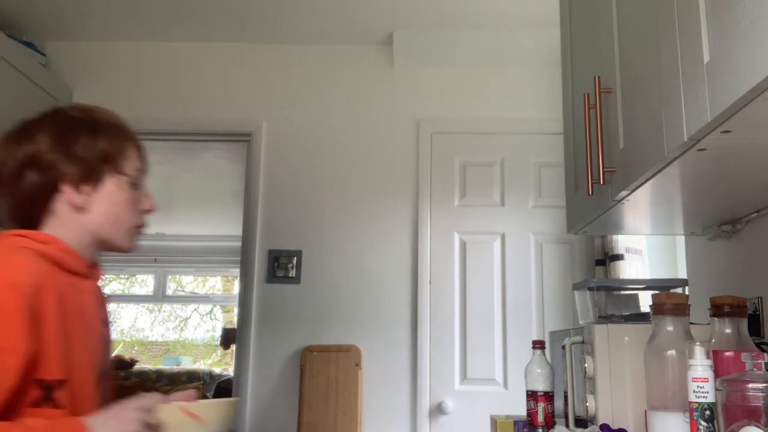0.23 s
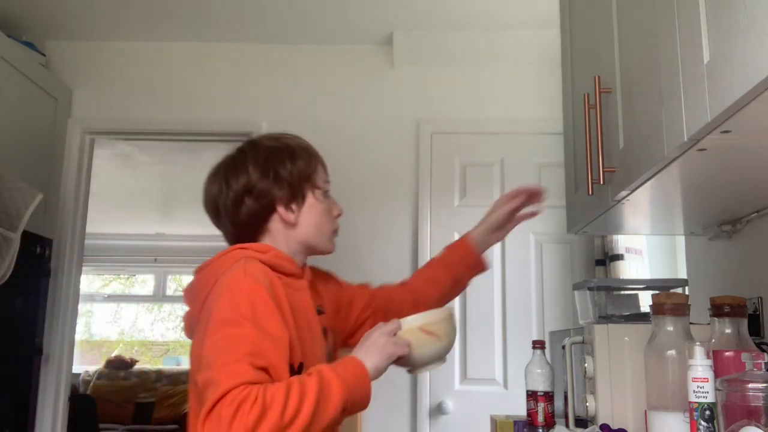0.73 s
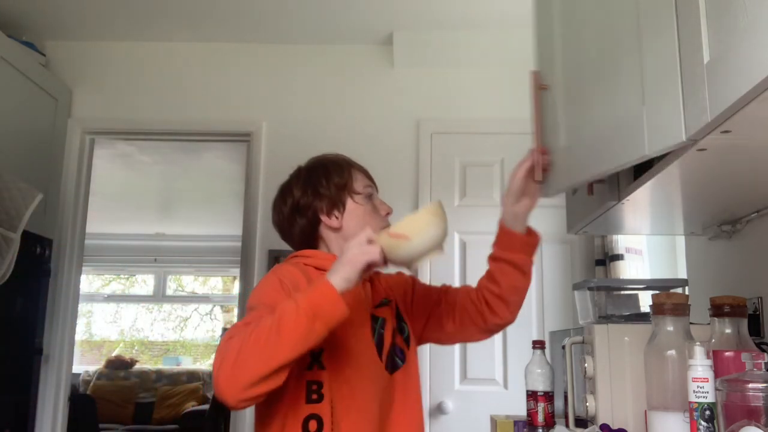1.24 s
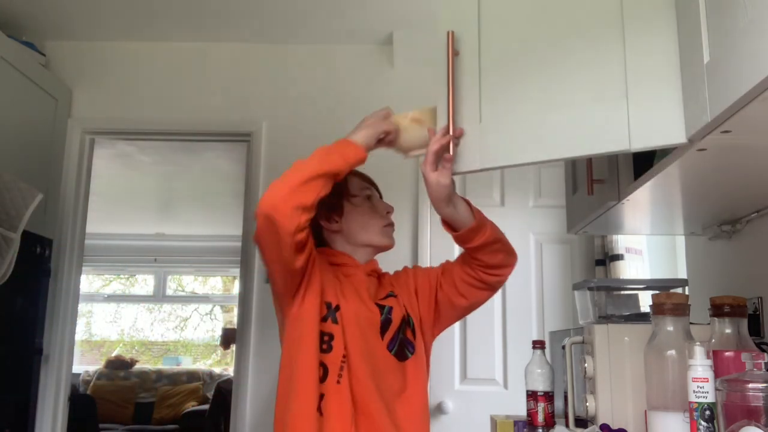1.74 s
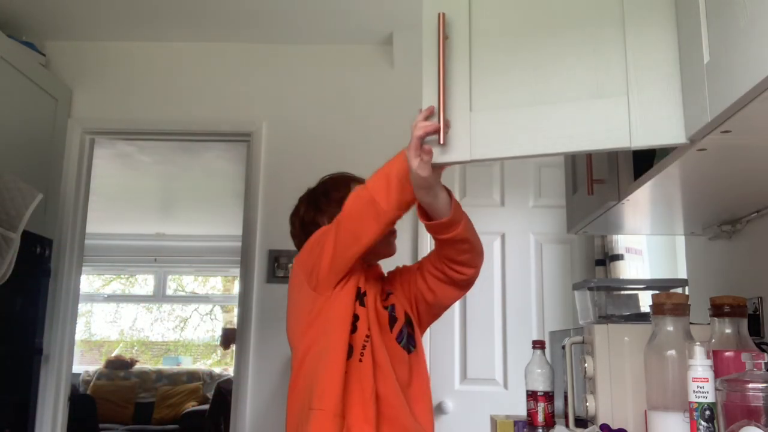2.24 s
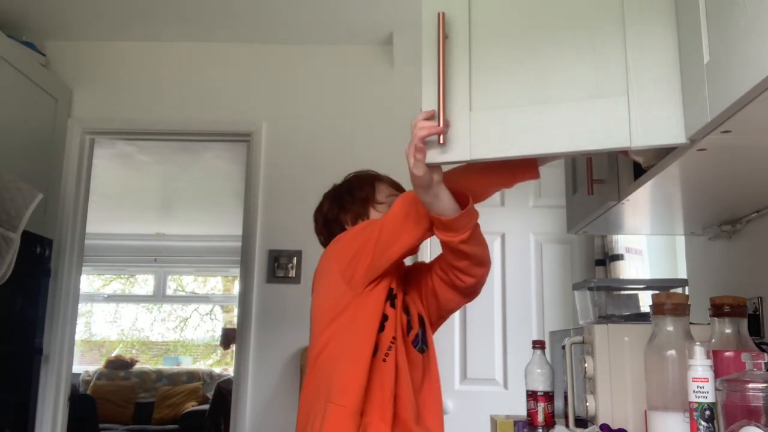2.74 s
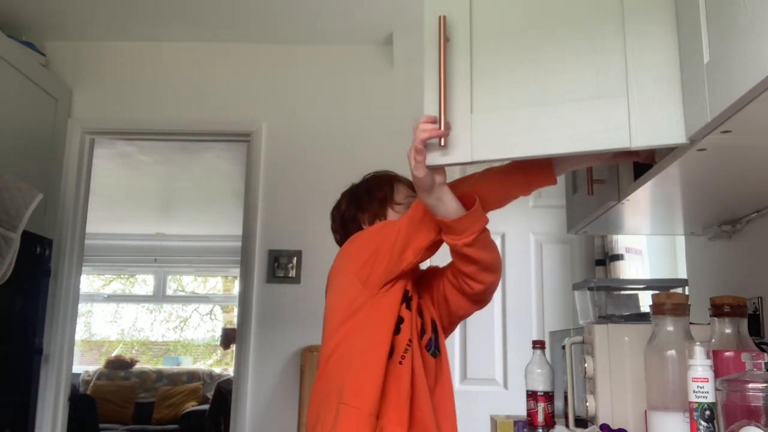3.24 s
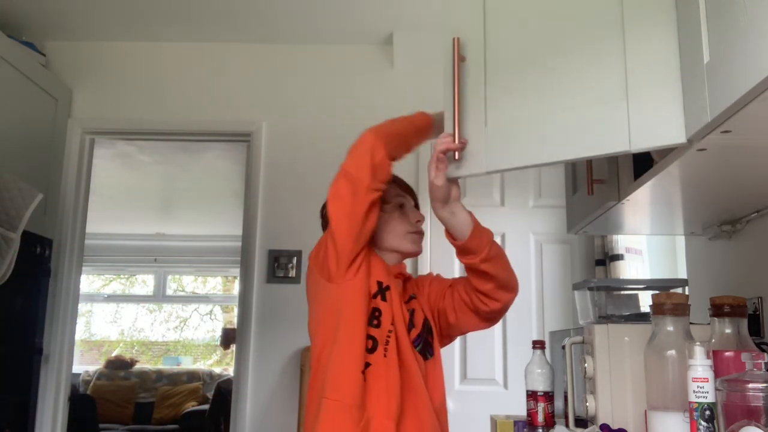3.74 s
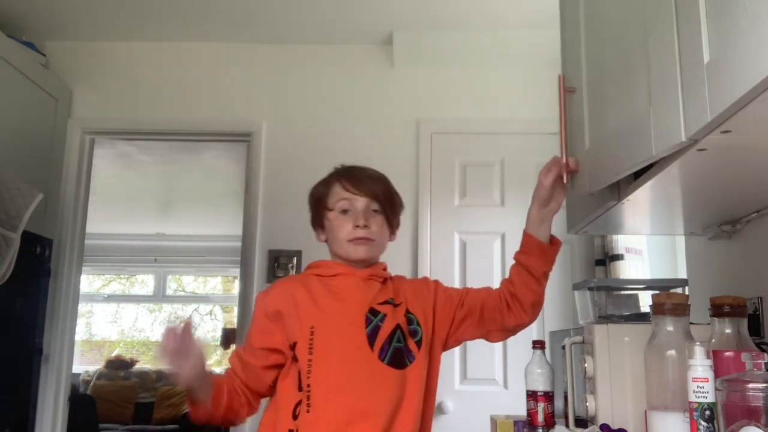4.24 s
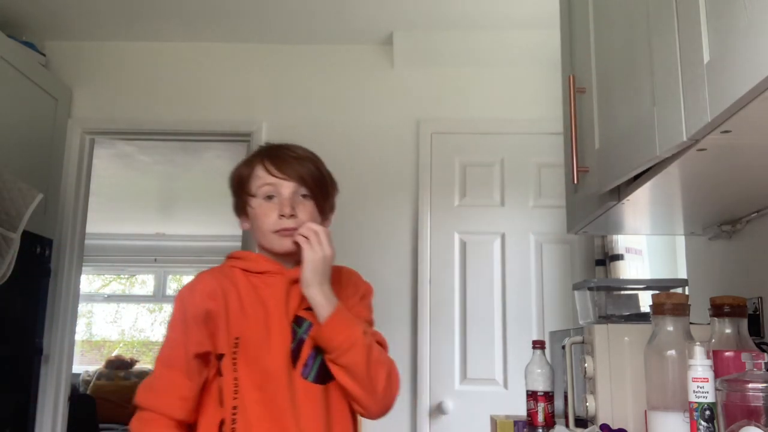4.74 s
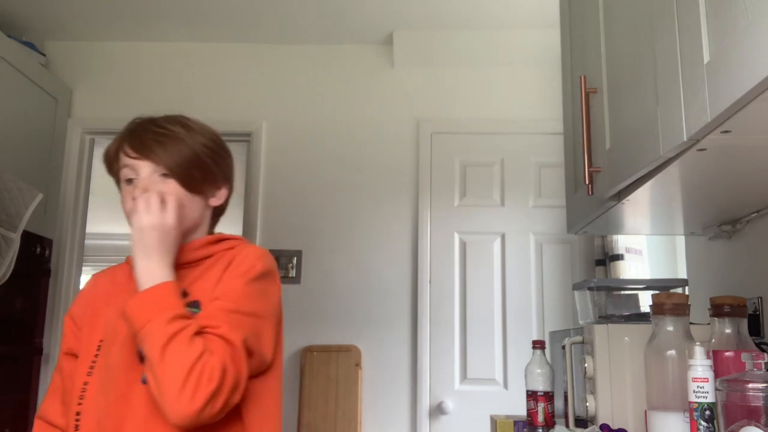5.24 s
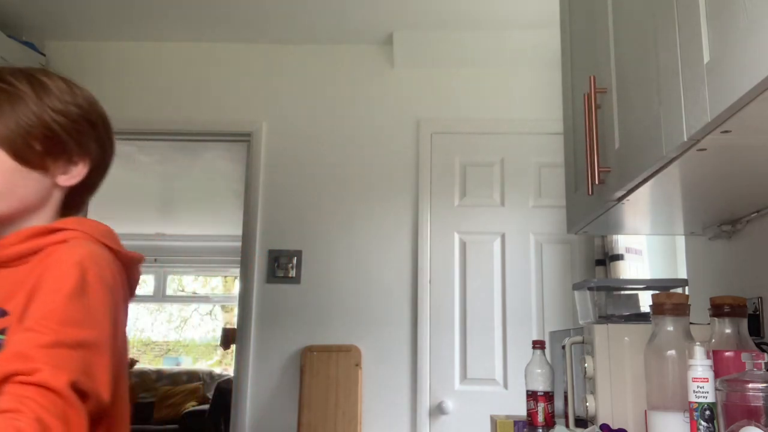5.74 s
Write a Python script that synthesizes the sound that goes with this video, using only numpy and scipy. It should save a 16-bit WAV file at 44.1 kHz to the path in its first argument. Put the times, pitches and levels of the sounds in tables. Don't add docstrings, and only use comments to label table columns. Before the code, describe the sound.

A quiet small kitchen, heard by a close stereo microphone pair with short reflections. Throughout, a propeller aircraft outside drones away: a deep beating hum with wavering overtones and soft roar, swelling around 1 to 3 s, sagging in pitch and nearly gone by 6 s; a faint windowpane hum fades too. At 0.1 to 0.3 s a spoon tinks very lightly. At 0.93 s a hand knocks the cupboard handle with a low thud; small clicks follow at 1.07 s and sharp hinge snaps with rattle at 1.4 s. At 2.9 s a bowl lands on the shelf, the loudest event, a woody boom with clatter, then a hard clack as it settles at 3.04 s. Soft sleeve brushing follows. From 4.1 s come rubbing, faint crockery tinkles and dull damper thuds, notably 4.34 and 5.16 s. At 5.85 s the door shuts with a firm woody knock and brief rattle.

```python
import sys
import numpy as np
from scipy import signal
from scipy.fft import rfft, irfft, next_fast_len
from scipy.io import wavfile
from scipy.ndimage import uniform_filter1d

SR = 44100
rng = np.random.default_rng(int(sys.argv[2]) if len(sys.argv) > 2 else 0)


def to_linear_factor(level_db):
    exponent = np.asarray(level_db, float) / 20
    return 10 ** exponent


def transcribe(u):
    v = np.clip(np.atleast_2d(u).T, -1, 1)
    q = np.round(v * 32767).astype(np.int16)
    wavfile.write(sys.argv[1], SR, q)


N = 264631


def evened(x):
    return x / np.sqrt(np.mean(abs(x) ** 2) + 1e-20)


def read(points, hz, axis=1):
    points = np.array(points)
    return np.interp(np.log(hz + 1), np.log(points[:, 0] + 1), points[:, axis])


def add(mix, start_s, sound):
    part = mix[:, round(start_s * SR):][:, :sound.shape[1]]
    part += sound[:, :part.shape[1]]


def causal(colour):
    hz = abs(np.fft.fftfreq(8192, 1 / SR))
    log_gain = np.log(to_linear_factor(np.maximum(read(colour, hz), -100)))
    phase = -signal.hilbert(log_gain).imag
    return np.fft.ifft(np.exp(log_gain + 1j * phase)).real[:4096]


def in_kitchen(x, room_db):
    # frequency in Hz, t60 in seconds.
    decay = [(80, 0.69), (250, 0.32), (1000, 0.25), (2500, 0.31), (7000, 0.25)]
    shape, gap = (2, 26624), 130
    taps = rng.choice([-1., 1.], shape) * (rng.random(shape) < .06)
    taps[:, :gap] = 0
    hz, t, z = signal.stft(taps, SR, nperseg=512)
    t60_s = np.maximum(read(decay, hz), .05)[:, None]
    tail = signal.istft(z * to_linear_factor(-60 * t / t60_s), SR, nperseg=512)[1]
    tail[:, :gap] = 0
    tail *= to_linear_factor(room_db) / np.linalg.norm(tail[0])
    tail[:, 0] = 1
    return signal.fftconvolve(x, tail, axes=1)


def slow_waver():
    noise = rng.standard_normal((2, N))
    return evened(uniform_filter1d(uniform_filter1d(noise, 4000), 4000))


def air():
    # time in seconds, level in dB.
    roar_level = [
        (0, -51.5),
        (1, -53),
        (4.2, -57),
        (5, -63),
        (5.7, -61),
        (6, -65),
    ]
    # frequency in Hz, level in dB.
    roar_colour = [(53, -37), (90, -13), (102, -1), (133, -19.5), (161, -11.5), (278, -8.5), (324, -16),
                   (519, -22), (605, -26), (985, -25.5), (2500, -51), (3250, -89)]
    # frequency in Hz, level in dB.
    room_colour, room_tone_db = [(18, -21.5), (30, -11.5), (59, 0.5), (97, -25), (136, -13), (211, -35),
                                 (253, -34.5), (296, -38.5), (597, -46), (1030, -33.5), (1370, -50.5),
                                 (6530, -55), (8920, -69), (12200, -57.5), (15000, -60)], -60.5
    # frequency in Hz, width in Hz,
    # lift in dB.
    standing_waves = [(195.57, 3.5, 9.5), (270, 8.8, 1), (292, 2.6, 0), (310, 15, -3), (401, 26, 5.5),
                      (524.6, 17, 12), (748.5, 9.8, 15), (880, 27, 6.5), (977, 140, 5), (997, 51, 4.5)]
    frames, hz = N // 512 + 5, np.fft.rfftfreq(2048, 1 / SR)
    re, im = rng.standard_normal((2, 2, 1025, frames))
    patches = rng.standard_normal((1025, frames))
    patches = evened(uniform_filter1d(uniform_filter1d(patches, 14, 0), 5, 1))

    standing = to_linear_factor(sum(db / (1 + (2 * (hz - f) / width) ** 2) for f, width, db in standing_waves))
    tone = to_linear_factor(read(room_colour, hz)) * standing
    tone *= to_linear_factor(room_tone_db - 3) / np.linalg.norm(tone[hz > 100])
    roar = to_linear_factor(read(roar_colour, hz)) * (hz < 2500) * standing
    roar /= np.linalg.norm(roar[(hz > 150) & (hz < 600)])
    roar_db = np.interp(np.arange(frames) * 512 / SR, *np.transpose(roar_level)) - 1.5
    flicker_db = np.outer(np.clip((hz - 5500) / 3000, 0, 1), 2.4 * rng.standard_normal(frames))
    size = np.hypot(tone[:, None], np.outer(roar, to_linear_factor(roar_db)))
    size *= to_linear_factor(2.62 * patches + flicker_db)
    return 0.65 * signal.istft((re + 1j * im) * size, nperseg=2048, noverlap=1536)[1][:, :N]


def window_pane():
    hz, sag_hz_per_s, level_db = 292.7, 3.2, -66.5
    swell_s, swell_width_s, swell_db = 0.917, 0.22, 11.5
    gone_s, fade_db_per_s = 3, 25.5
    t = np.arange(N) / SR
    waver = slow_waver()
    level_db = level_db + swell_db * np.exp(-((t - swell_s) / swell_width_s) ** 2)
    level_db = level_db - fade_db_per_s * np.maximum(t - gone_s, 0)
    tone = np.sin(2 * np.pi * (hz - sag_hz_per_s * t / 2) * t + 3.33 * waver)
    return np.sqrt(2) * to_linear_factor(level_db + 1.5 * waver[::-1]) * tone


def propeller():
    # time in seconds, pitch in Hz, right port level in dB.
    flyover = [(0, 74.53, -48), (0.502, 74.27, -42), (0.998, 71.76, -42.5), (1.3, 68.4, -43),
               (1.5, 67.1, -35.5), (2, 64.13, -33), (2.351, 62.35, -39), (2.6, 61.15, -36),
               (3, 60.2, -35.5), (3.599, 57.95, -40.5), (4.15, 56.2, -36), (4.55, 55, -44.5),
               (5, 53.44, -47), (5.501, 51.64, -50.5), (5.64, 52, -55.5), (5.78, 52.4, -73),
               (5.931, 51, -53.5)]
    # time in seconds, beats per second, level in dB.
    bounce = [
        (0, 3.74, -61),
        (.5, 5.25, -41),
        (1, 5.5, -37.5),
        (1.5, 4.56, -47.5),
        (2, 4.1, -43.5),
        (2.6, 3.2, -62),
        (3.201, 4.8, -77.5),
    ]
    # pitch in Hz, left-right in dB, left lead in radians.
    bass_at_ports = [(52, -18, 5.8), (56.5, -16, 7.9), (60.26, -27, 6.0), (60.94, -14, 3), (62.6, -11, 2.7),
                     (68.4, -7, 2.1), (70, -4, 0.76), (73, -11.5, 1.3)]
    # order, level in dB against the second.
    upper_orders = [(3, -8.5), (4, -15.5), (5, -14), (6, -22)]
    bounce_turns = 0.73
    second_db, follow, fade_db_per_s = -58.5, 0.45, 3
    t = np.arange(N) / SR
    s, hz, db = np.transpose(flyover)
    hz, db = np.interp(t, s, hz), np.interp(t, s, db)
    s, beat_hz, bounce_db = np.transpose(bounce)
    pitch = np.array([hz, hz - np.interp(t, s, beat_hz)])
    size = uniform_filter1d(to_linear_factor(np.array([db, np.interp(t, s, bounce_db)])), 4000)
    turn = 2 * np.pi * (np.cumsum(pitch, 1) / SR + [[0], [bounce_turns]])

    second = to_linear_factor(second_db + follow * (db - db.mean()) - fade_db_per_s * t)
    orders = np.zeros((2, N))
    for order, order_db in [(2, 0.0037)] + upper_orders:
        waver = slow_waver()
        tone = np.sin(order * turn[0] + 0.47 * order * waver[::-1])
        orders += np.sqrt(2) * second * to_linear_factor(order_db + 4.3 * waver) * tone

    left_lead = read(bass_at_ports, pitch, axis=2)
    left = size * to_linear_factor(read(bass_at_ports, pitch)) * np.cos(turn + left_lead)
    right = size * np.cos(turn)
    return orders, np.sqrt(2) * np.array([left.sum(0), right.sum(0)])


def rings(mix, modes, taps):
    t, quarter = np.arange(SR // 2) / SR, np.array([[0], [1 / 4]])
    for s, tap_db in taps:
        ring = 0
        for hz, db, t60_s in modes:
            level = to_linear_factor(tap_db + db - 60 * t / t60_s)
            ring = ring + level * np.sin(2 * np.pi * (hz * t + rng.random() + quarter))
        add(mix, s, in_kitchen(ring * np.minimum(t / 0.0023, 1), room_db=-3.5))


def small_rings(mix):
    # start in seconds, level in dB.
    spoon = [
        [(2230, -0.5, 0.1), (3920, -12, 0.11), (5950, -17, 0.11)],
        [(.11, -75), (.14, -68.5), (.3, -84)],
    ]
    crockery = [
        [(3310, 0.45, 0.33)],
        [(4.228, -80.5), (4.29, -89), (4.415, -89.5)],
    ]
    saucer = [
        [(1773, -2, 0.89), (1850, -11, 0.2)],
        [(4.29, -87), (4.345, -77)],
    ]
    for modes, taps in (spoon, crockery, saucer):
        rings(mix, modes, taps)


def brushes(mix):
    # frequency in Hz, level in dB.
    brush_colour = [(240, -49.5), (400, -9.5), (631, -8.5), (909, -1.5), (1490, -7), (2380, -13.5),
                    (3050, -28.5), (4450, -28), (9000, -45), (11700, -68)]
    # start in seconds, rise in seconds, fall in seconds, peak in dB, brightness in dB.
    strokes = [(.39, .07, 0.041, -78, -10), (1.398, 0.015, .01, -65, 12), (3.15, 0.021, 0.15, -75, 8),
               (3.26, 0.028, .1, -79.5, -4), (3.36, 0.046, 0.14, -84, -8), (1.085, .025, .07, -78, 9),
               (4.105, .03, 0.089, -76.5, 15.5), (4.13, .012, 0.27, -69.5, -3.5),
               (4.295, 0.024, 0.064, -77.5, -19.5), (4.49, 0.06, 0.043, -80.5, 2),
               (4.68, .12, .16, -82, -1), (5.3, .03, 0.064, -88, 9), (5.44, .085, .06, -78.5, 10.5),
               (5.52, .17, 0.16, -88, 1)]
    depth_db, dulling = -15.5, 0.51
    high = signal.butter(4, 3200., "high", fs=SR, output="sos")
    low = signal.butter(4, 3200., "low", fs=SR, output="sos")
    for s, rise_s, fall_s, db, bright_db in strokes:
        t = np.arange(0, rise_s + fall_s, 1 / SR)
        rising_db = depth_db * np.maximum(1 - t / rise_s, 0)
        falling_db = depth_db * np.maximum((t - rise_s) / fall_s, 0)
        grains = rng.standard_normal((2, len(t))) * to_linear_factor(1.7 * rng.exponential(1, len(t)))
        rub = evened(signal.fftconvolve(grains, causal(brush_colour)[None], axes=1)[:, :len(t)])
        treble = to_linear_factor(bright_db + dulling * falling_db) * signal.sosfilt(high, rub)
        rub = (signal.sosfilt(low, rub) + treble) * signal.windows.tukey(len(t), .1)
        add(mix, s, in_kitchen(to_linear_factor(db + rising_db + falling_db + 5.0) * rub, room_db=-4.5))


def contacts(table, cycles, rough):
    t, quarter, out = np.arange(8192) / SR, np.array([[0], [1 / 4]]), np.zeros((2, N))
    for s, hz, db, t60_s in table:
        shake = rough * rng.standard_normal((2, 256))
        size, wobble = (np.interp(t * hz / 6, np.arange(256), row) for row in shake)
        tone = np.sin(2 * np.pi * (hz * t + rng.random() + quarter) + 2 * wobble)
        swing_up = 1 - np.exp(-(t * hz / cycles) ** 2)
        add(out, s, to_linear_factor(db - 60 * t / max(t60_s, .01)) * (1 + size) * tone * swing_up)
    return in_kitchen(out, room_db=-8.5)[:, :N]


def ticks():
    # start in seconds, frequency in Hz, peak in dB, t60 in seconds.
    tick_table = [(.123, 5960, -82, 0.071), (.148, 5940, -82, .08), (.308, 2190, -74, .03),
                  (.923, 2830, -65, .03), (.9235, 5650, -66.5, .03), (.9286, 4900, -62.5, .04),
                  (1.0685, 6300, -71, 0.018), (1.0877, 4080, -66, 0.033), (1.089, 3410, -66, 0.033),
                  (1.117, 2190, -71, 0.045), (3.0405, 1980, -37.5, 0.04), (1.4, 3336, -63, 0.071),
                  (1.416, 5290, -48, 0.04), (1.4197, 3480, -45, .03), (1.4335, 6160, -58, 0.06),
                  (1.448, 2370, -53, 0.044), (1.4665, 5460, -64, .05), (1.487, 5940, -66, 0.075),
                  (1.52, 4607, -65, 0.04), (2.052, 2687, -65, .04), (2.053, 4600, -83, .03),
                  (2.9, 2000, -48, 0.054), (2.901, 3405, -58, .07), (2.906, 5980, -69.5, .04),
                  (2.907, 810, -22, 0.042), (2.9167, 738, -31, .04), (2.9267, 1014, -22.5, 0.031),
                  (2.941, 4020, -61.5, 0.057), (3.04, 2480, -40, .04), (3.047, 1088, -38.5, .04),
                  (3.1065, 1014, -39, 0.057), (3.169, 3550, -71, 0.054), (3.17, 6600, -76.5, .04),
                  (3.28, 2020, -73, 0.085), (4.155, 4400, -78, .05), (4.138, 1364, -60.5, 0.055),
                  (4.139, 3745, -72, .04), (4.187, 2330, -60, 0.025), (4.185, 1140, -59, 0.035),
                  (4.245, 3310, -77.5, 0.15), (4.316, 1188, -61.5, 0.045), (4.335, 3310, -78.5, .1),
                  (5.591, 911.3, -65, 0.04), (5.8475, 6140, -62, 0.091), (5.853, 4840, -59, 0.068),
                  (5.88, 3384, -65, 0.059), (5.908, 7000, -79, .03), (5.849, 1760, -60, 0.055),
                  (1.069, 7800, -82, .02)]
    return contacts(tick_table, cycles=2.0, rough=.45)


def thumps():
    # start in seconds, frequency in Hz, peak in dB, t60 in seconds.
    thump_table = [(.025, 280, -47, 0.17), (.19, 255.4, -48, 0.45), (.962, 142, -30, 0.041),
                   (1.35, 264.6, -42, .1), (4.09, 260, -50, 0.097), (4.235, 255, -45.5, 0.084),
                   (4.268, 244, -53, .08), (4.34, 108, -20, 0.084), (4.405, 131, -40.5, 0.075),
                   (5.55, 81.7, -40, 0.086), (5.6, 72.3, -47, 0.12), (5.78, 142, -51, 0.049),
                   (5.91, 65, -47.5, 0.14), (2.903, 548, -36.5, 0.088), (2.938, 470, -38.5, 0.047),
                   (2.963, 593, -34, 0.036), (5.877, 675, -33.5, .13), (5.899, 641, -40, 0.15),
                   (5.8995, 770, -37, .05), (5.834, 561, -49.5, .06), (2.9045, 244, -17, 0.062),
                   (2.964, 315, -33.5, 0.033), (.942, 924, -51, 0.22), (1.43, 334, -46, 0.081)]
    return contacts(thump_table, cycles=0.42, rough=0.15)


def clatter():
    # start in seconds, frequency in Hz, peak in dB, t60 in seconds.
    clatter_table = [(0.9285, 6070, -75, 0.03), (0.938, 3750, -68, 0.1), (0.955, 3690, -72, 0.11),
                     (1.0658, 4240, -72, 0.05), (1.0666, 4651, -72, 0.05), (1.0673, 5700, -74, 0.05),
                     (1.4163, 4066, -52, 0.058), (1.4294, 3502, -59, 0.05), (1.4345, 5300, -66, 0.05),
                     (1.4366, 4400, -53, 0.05), (1.4446, 6144, -62, 0.05), (1.4468, 2390, -55, 0.05),
                     (1.4526, 4500, -55, 0.05), (1.4562, 5200, -63, 0.05), (1.4642, 5100, -59, 0.056),
                     (1.4824, 5240, -61, 0.05), (2.9046, 5260, -80, 0.05), (2.9082, 2550, -53, 0.05),
                     (2.9184, 1994, -35.5, 0.048), (2.9227, 3220, -65, 0.05), (2.9249, 3580, -58, 0.054),
                     (2.9271, 3970, -61, 0.058), (2.9336, 1296, -32.5, 0.036), (2.9416, 2170, -48.5, 0.05),
                     (2.9467, 2560, -63, 0.05), (2.9568, 935, -33.5, 0.063), (2.9583, 2067, -55, 0.05),
                     (2.9887, 1894, -62, 0.05), (3.0403, 4730, -63, 0.05), (3.0403, 5070, -66, 0.05),
                     (3.0562, 943, -36.5, 0.05), (3.0562, 1890, -40.5, 0.05), (3.0686, 3170, -60, 0.05),
                     (3.0903, 3660, -66, 0.05), (3.0911, 2540, -65.5, 0.039), (3.0918, 990, -33, 0.044),
                     (3.0969, 1900, -56, 0.05), (3.1099, 1492, -56.5, 0.041), (5.847, 3300, -57.5, 0.042),
                     (5.847, 3970, -56, 0.05), (5.855, 6020, -69, 0.043), (5.8731, 3350, -66, 0.05),
                     (5.8811, 6000, -72, 0.05), (5.8941, 4593, -68, 0.05), (5.897, 4070, -74, 0.05),
                     (5.9094, 1528, -57.5, 0.12), (5.905, 930, -42, .06), (3.058, 1410, -42, .05),
                     (3.285, 2390, -76, 0.11), (3.42, 2267, -79, 0.23)]
    return contacts(clatter_table, cycles=1.8, rough=0.63)


def knocks(mix, colour, resonances, blows, modes_db, rise_s, snap_db):
    t = np.arange(4096) / SR
    fade = np.hanning(8192)[4096:]
    modes = sum(to_linear_factor(db) * np.exp(-np.pi * width * t) * np.sin(2 * np.pi * hz * t)
                for hz, width, db in resonances)
    modes = to_linear_factor(modes_db) * evened(modes * (1 - np.exp(-(t / rise_s) ** 2)) * fade)
    body = causal(colour)[None]
    for s, db, rattle_s, room_db in blows:
        grit = rng.standard_normal((2, 4096)) * to_linear_factor(2.27 * rng.exponential(1, 4096))
        grit = evened(grit * (t + 0.00026) * np.exp(-t / max(rattle_s, .0005)))
        grit[:, 0] = to_linear_factor(18.5)
        sound = evened(signal.fftconvolve(grit, body, axes=1)[:, :4096] * fade) + modes
        sound = in_kitchen(sound, room_db)
        sound[:, :4096] += to_linear_factor(snap_db) * rng.standard_normal((2, 4096)) * np.exp(-t / .004)
        add(mix, s, to_linear_factor(db) * sound / abs(sound).max())


def handle(mix):
    # colour Hz, dB; modes Hz, width in Hz, dB; blows start in s, peak dB, rattle in s, room dB.
    struck = [
        [(180, -7), (300, -0.5), (656, -12.5), (923, -2), (1210, -22), (2470, -29.5), (3420, -32), (3720, -33.5), (9000, -55), (11700, -86)],
        [(930, 86, -15), (2560, 260, -15), (3780, 250, -18), (4800, 350, -18), (6050, 350, -21.5)],
        [(.926, -41.5, 0.0038, 5.5), (.944, -55.5, 0.0041, 4.5)],
    ]
    knocks(mix, *struck, modes_db=-11.0, rise_s=0.0038, snap_db=-29)


def hinge(mix):
    # colour Hz, dB; modes Hz, width in Hz, dB; blows start in s, peak dB, rattle in s, room dB.
    struck = [
        [(290, -35), (500, -20.5), (587, -1), (670, -13), (745, 1.5), (1470, -15), (2400, -11), (6090, -23), (7140, -38), (12000, -55), (15600, -78)],
        [(706, 27, -7.5), (890, 41, 8), (2390, 200, -5), (3330, 220, -8), (4470, 310, -8), (4860, 120, -6), (6430, 150, -13)],
        [(1.068, -59, 0.0019, 2), (1.087, -61, 0.0049, -4.5), (1.11, -60.5, 0.0028, -0.5), (1.352, -67, 0.0033, 5), (1.415, -37.5, 0.003, 1), (1.428, -44, 0.0025, 2.7), (1.45, -56.5, 0.0038, -8), (1.478, -61, 0.015, -13), (2.052, -59, 0.0026, 2.5)],
    ]
    knocks(mix, *struck, modes_db=-16.5, rise_s=0.0018, snap_db=-4.0)


def shelf(mix):
    # colour Hz, dB; modes Hz, width in Hz, dB; blows start in s, peak dB, rattle in s, room dB.
    struck = [
        [(50, -32.5), (85, -4), (250, -6), (394, -13.5), (474, -17), (634, -16.5), (1000, -14.5), (1540, -23), (2600, -32), (3000, -43), (4300, -47), (12000, -75), (15600, -112)],
        [(120.4, 8.2, -14.5), (248.2, 52.7, 9), (289.4, 18, -15), (479.6, 56.6, -2), (584, 54, -30.5), (761, 110, -4), (1008, 72, -14.5), (1230, 180, -19.5), (1690, 240, -22), (2190, 123, -21), (2500, 180, -26)],
        [(2.9, -17, 0.007, -1), (2.915, -21.5, 0.0023, -0.5), (2.938, -28.5, 0.002, -1), (2.963, -26, 0.0043, 4.5), (3.16, -40, 0.017, 5)],
    ]
    knocks(mix, *struck, modes_db=7.5, rise_s=0.0046, snap_db=-26.0)


def bowl(mix):
    # colour Hz, dB; modes Hz, width in Hz, dB; blows start in s, peak dB, rattle in s, room dB.
    struck = [
        [(88, -23.5), (150, 9.5), (237, -21), (314, -3), (438, -12), (470, -20.5), (916, -8), (1040, -4.5), (3610, -34.5), (10000, -71.5), (13000, -117)],
        [(260, 94, 8.5), (470, 43, -0.5), (788, 84, 3.5), (1061, 13, -3), (1410, 23, -4.5), (1714, 33, -9.5), (2020, 68, -10), (2480, 130, -7), (3020, 440, -20), (3400, 140, -13)],
        [(3.04, -27, 0.0043, -1.5), (3.048, -25.5, 0.0086, -2.5), (3.065, -36, 0.0065, -10), (3.162, -53, 0.0041, -5)],
    ]
    knocks(mix, *struck, modes_db=-4.0, rise_s=0.00074, snap_db=-35.5)


def damper(mix):
    # colour Hz, dB; modes Hz, width in Hz, dB; blows start in s, peak dB, rattle in s, room dB.
    struck = [
        [(44, -19), (75, 4.5), (139, -15), (204, -33.5), (247, -28.5), (378, -19.5), (600, -48), (780, -83.5), (1320, -120)],
        [(72.3, 18, -2), (90.7, 19, -2.5), (111.4, 21.8, 3.5), (161.5, 16.1, -3.5)],
        [(.93, -27.5, 0.0052, 1.5), (.942, -30, 0.024, -9.5), (.962, -36, 0.0083, -7.5), (1.068, -36.5, 0.0062, -1.5), (1.352, -35.5, 0.0028, 3), (3.22, -37.5, 0.0029, -8.5), (4.09, -40.5, 0.028, -2), (4.187, -34, 0.0031, -12.5), (4.336, -31.5, 0.012, -11.5), (5.158, -37.5, 0.0072, -4), (5.55, -53.5, 0.0039, -3.5), (5.72, -52.5, 0.0092, 0)],
    ]
    knocks(mix, *struck, modes_db=9.5, rise_s=0.0059, snap_db=-90.0)


def door(mix):
    # colour Hz, dB; modes Hz, width in Hz, dB; blows start in s, peak dB, rattle in s, room dB.
    struck = [
        [(50, -53.5), (85, -46), (260, -16), (330, -18), (410, -14.5), (515, -16), (647, -12), (1500, -24), (2110, -39.5), (6060, -49), (9360, -58), (12000, -82), (15600, -104)],
        [(129, 17, -14.5), (383, 45, -12.5), (586, 31, 3), (638.9, 26, -0.5), (676, 37, -13.5), (737, 40, -21), (1002, 79, 6), (1074, 31, -10), (1505, 70, -15), (4940, 160, -38), (6020, 160, -23.5)],
        [(5.833, -49, 0.0033, 2.5), (5.849, -21, 0.014, -5.5), (5.86, -31.5, 0.002, -6), (5.899, -47, 0.004, 0.5)],
    ]
    knocks(mix, *struck, modes_db=7, rise_s=.004, snap_db=-40)


def ports(fields):
    # frequency in Hz, left-right in dB, likeness 0-1, left lead in radians.
    port_pair = [(55, -9, 0.95, 1.5), (134, -15.5, 0, 4.8), (280, -9.5, 0.94, 4.04),
                 (406, -4.5, 0.78, 3.24), (597, -5, 0.98, 2.65), (900, 6.5, 0.94, 2.16),
                 (1060, 5.5, 0.39, 3.8), (1240, 5, 0.2, 0.31), (1890, 0, 0, 0.9), (2800, 0.5, 0, 3.1),
                 (4220, -1, 0.05, 0.38), (5700, 3.5, 0, 1.5)]
    port_treble = [(7300, 0, .75, 3.0), (10300, 0, .85, 3.2), (11500, 0, .6, 4.8),
                   (12600, 0, .9, 6.1), (15000, 0, .95, 6.3)]
    pair = list(port_pair) + port_treble
    size = next_fast_len(N + 4096)
    hz = np.fft.rfftfreq(size, 1 / SR)
    a, b = rfft(np.pad(fields, [(0, 0), (0, 2048)], "reflect"), size)
    gain, lead = to_linear_factor(read(pair, hz)), read(pair, hz, axis=3)
    same = np.clip(read(pair, hz, axis=2), 0, 1)
    left = gain * (same * np.exp(1j * lead) * a + np.sqrt(1 - same ** 2) * b)
    mean = np.sqrt(1 + gain ** 2 + 2 * gain * same * np.cos(lead)) / 2
    return irfft(np.array([left, a]) / mean, size)[:, :N]


def scene():
    # frequency in Hz, level in dB.
    roll_off = [(5500, 0.5), (6800, 2.5), (8500, -7), (10000, -5.5), (12500, 1.5), (14500, -8.5),
                (16000, -22)]
    orders, blade_tone = propeller()
    near = np.zeros((2, N))
    for source in (small_rings, brushes, handle, hinge, shelf, bowl, damper, door):
        source(near)
    near = signal.fftconvolve(near, causal(roll_off)[None], axes=1)[:, :N]
    fields = air() + window_pane() + orders + ticks() + thumps() + clatter() + near
    return ports(fields) + blade_tone


def low_pass(x):
    return signal.sosfilt(signal.butter(12, 15450, fs=SR, output="sos"), x)


def record(dry):
    cut = signal.butter(6, 46., "high", fs=SR, output="sos")
    lead_in = np.pad(dry, [(0, 0), (4096, 0)], "reflect")
    return low_pass(signal.sosfilt(cut, lead_in)[:, -N:])


dry = scene()
out = record(dry)
transcribe(out)
```